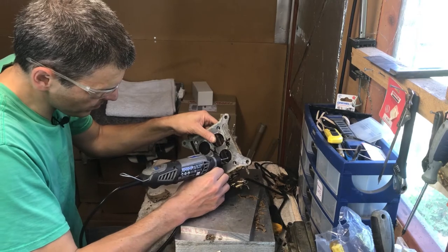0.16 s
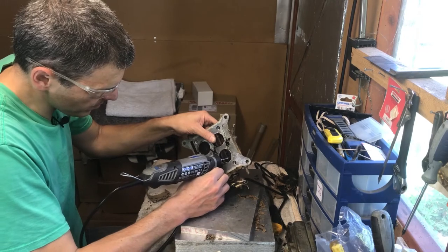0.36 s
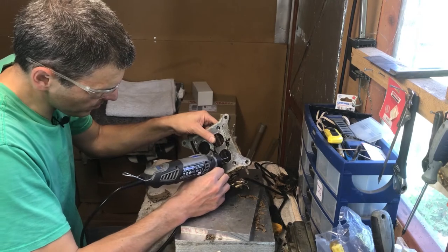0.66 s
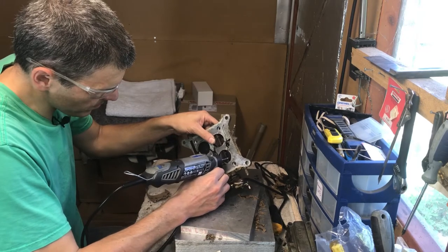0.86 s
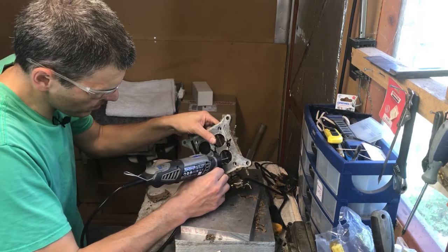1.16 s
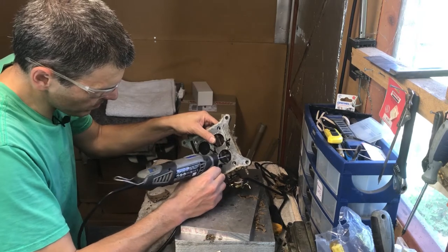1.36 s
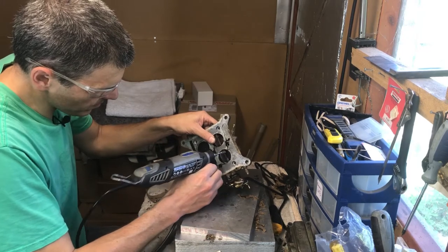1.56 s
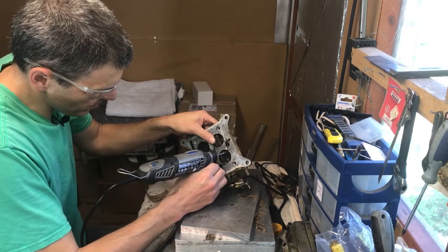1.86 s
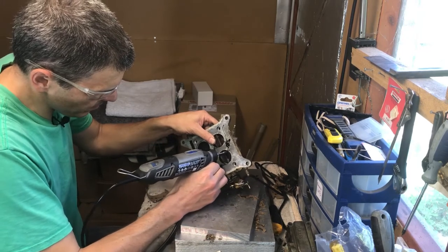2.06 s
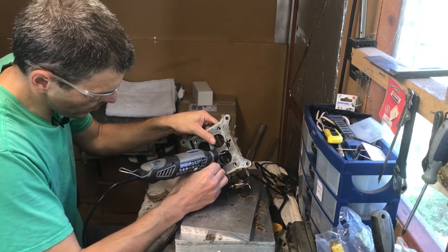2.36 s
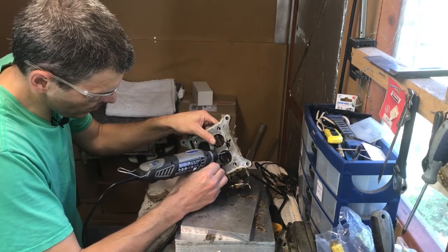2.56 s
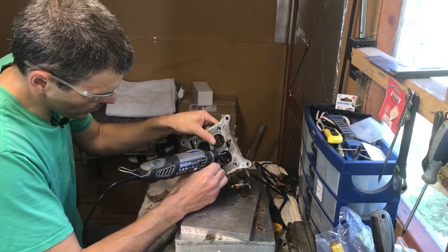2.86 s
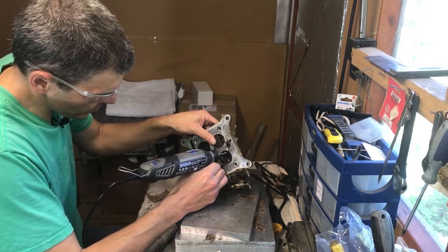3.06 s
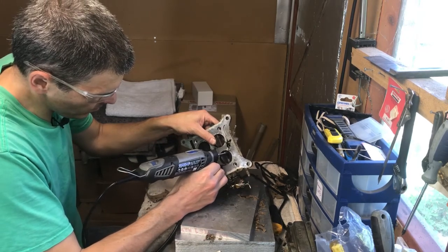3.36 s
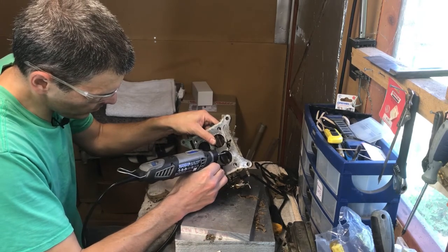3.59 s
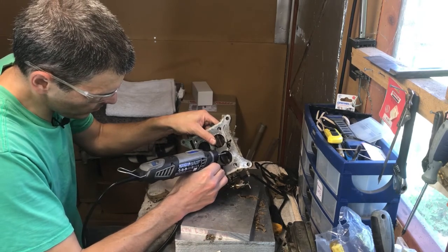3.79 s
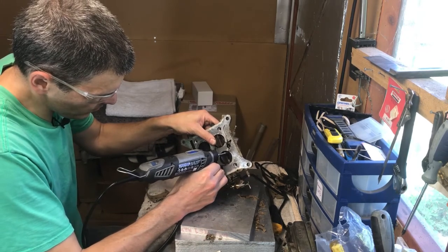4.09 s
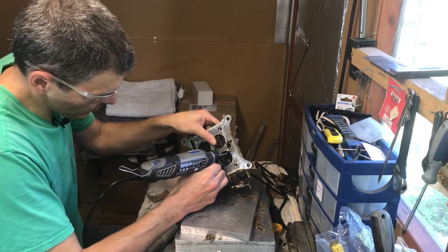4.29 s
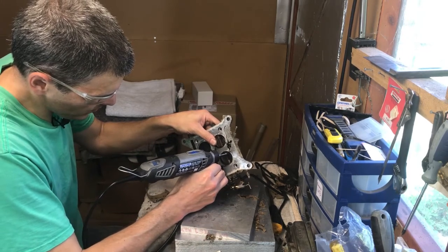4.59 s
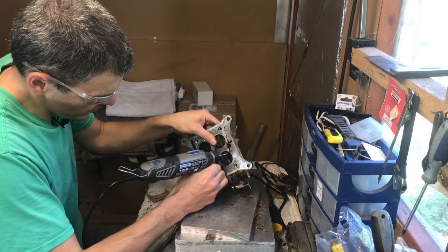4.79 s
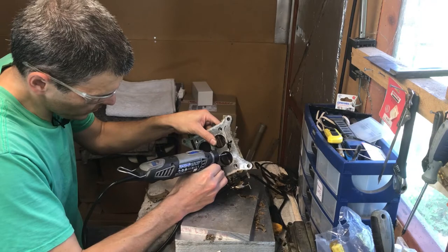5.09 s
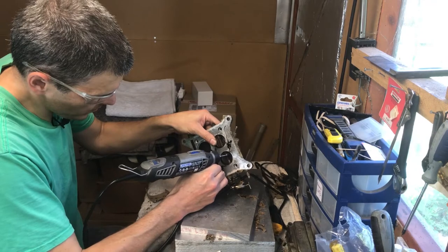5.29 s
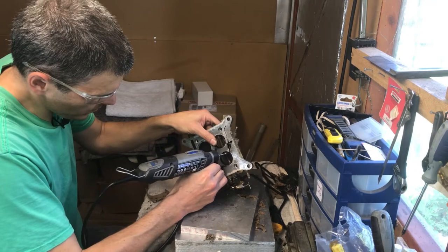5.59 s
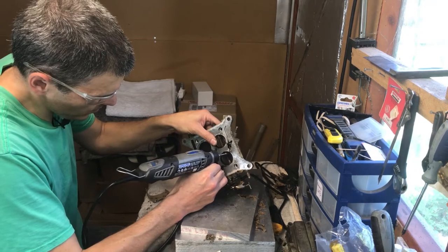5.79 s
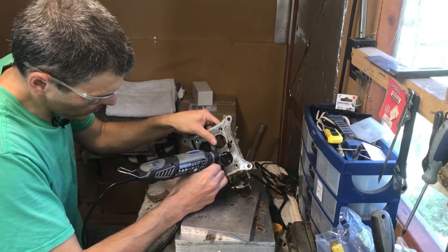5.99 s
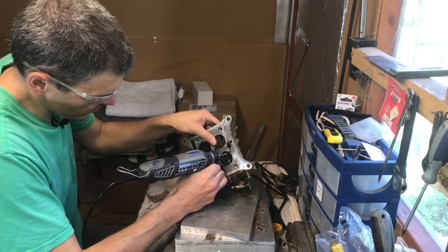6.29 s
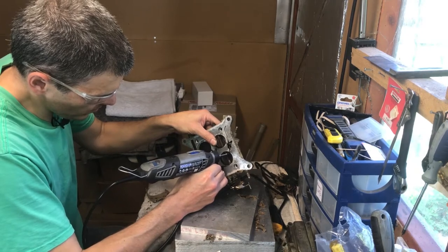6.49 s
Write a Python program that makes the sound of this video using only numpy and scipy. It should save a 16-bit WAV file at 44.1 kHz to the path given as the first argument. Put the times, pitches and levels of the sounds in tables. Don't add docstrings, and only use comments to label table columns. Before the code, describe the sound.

A handheld rotary grinder runs continuously close to the microphone in a small workshop. Its shrill motor whine and airy fan hiss hold steady while the bit rasps a cast metal part in short pushes. The cutting lightens for a moment, leaving the whine exposed, then returns harder and brighter, with the part ringing and faintly rocking on the bench.

```python
import sys
import numpy as np
from scipy import signal
from scipy.fft import rfft, irfft
from scipy.io import wavfile
from scipy.ndimage import uniform_filter1d

SR = 44100
rng = np.random.default_rng(int(sys.argv[2]) if len(sys.argv) > 2 else 0)


def digitize_waveform(pressure):
    field = np.atleast_2d(pressure).T
    bounded = np.clip(field, -1, 1)
    quanta = np.round(bounded * 32767).astype(np.int16)
    wavfile.write(sys.argv[1], SR, quanta)


def gain_from_db(level_db):
    decades = np.asarray(level_db, float) / 20
    return 10 ** decades


N = 293265
TIME = np.arange(N) / SR
HZ = np.fft.rfftfreq(N, 1 / SR)

BARS, SLOTS, TORQUE_HZ = 24, 8, 100.2
# tones_per_turn, level_db, rise_db_per_percent_of_speed
MAIN_TONES = [
    (24, -33, .6),
    (16, -42, 1),
    (12, -44.5, 1),
    (8, -40.5, 0),
    (1, -49.5, 1.5),
]
# tones_per_turn, level_db (against the whine)
WEAK_TONES = [(5, -16), (7, -16), (7.25, -14), (9, -16), (15, -14), (20, -17), (23, -14), (25, -13),
              (36, -15)]
# pitch_hz, level_db
MAINS_HUM = [(100, -75.5), (199.5, -61), (300, -59)]
# time_s, length_s, tones_per_turn (0 = side tones), change_db
GRIP_SHIFTS = [(0, .4, 24, -9), (1.42, .3, 24, 3), (1.85, .35, 24, -4), (.3, .7, 16, 5),
               (1.45, .2, 16, -12), (3.4, .2, 16, -7), (4.9, .9, 16, 5), (5.8, .5, 16, -6), (.2, .6, 12, 4),
               (1.8, .36, 12, 7), (3, .2, 12, 6), (3.7, .4, 12, 3), (4.8, .8, 12, -4), (5.85, .6, 12, 4),
               (1.47, .42, 8, 7), (1.8, .25, 8, -14), (3.3, 1.4, 8, 2), (4.8, .5, 8, -4), (6.1, .9, 8, -7),
               (0, .3, 1, -4), (5, 1.1, 1, -6), (.2, .2, 0, 8), (.98, .7, 0, 11), (2.4, .3, 0, 6),
               (5.3, .4, 0, 6), (5.35, .45, 8, 5), (1.65, .9, 7.25, 5), (5.1, 1.5, 7.25, 4),
               (1.4, .3, 12, -3), (6, 1.2, 24, 2)]
# time_s, whine_hz
FREE_SPEED = [(0.0, 9550), (0.13, 9483), (0.5, 9606), (0.69, 9658), (1.3, 9626), (1.35, 9692), (2.28, 9553),
              (2.5, 9656), (2.95, 9545), (3.11, 9629), (4.16, 9575), (4.49, 9540), (4.64, 9681),
              (4.94, 9642), (5.35, 9605), (5.48, 9377), (5.67, 9701), (6.65, 9572)]

# pitch_hz, level_db (per Hz)
FAN_COLOUR = [(25, -23), (70, -17), (140, -22), (520, -32), (650, -12), (1300, -10), (2600, -3), (4500, -3),
              (8500, -4), (10400, -5), (11500, -1.5), (15500, -5.5)]
# pitch_hz, width_hz, level_db
CASE_HUM = [(191.4, 14, -70.5), (436.4, 18, -56), (616, 26, -50.5), (987, 72, -45.5), (1937, 140, -54),
            (2800, 130, -54)]
# time_s, length_s, rise_db
ROCKS = [
    (.2, .5, 6),
    (.98, .15, 8),
    (2.66, .25, 10),
    (3.15, .2, 7),
    (4.1, 1.5, 6),
    (5.15, 0.89, 13.5),
    (5.72, .2, 10),
    (6.1, .6, 7),
]

# centre_s, peak_db, length_s, low_ring_db (extra as the bit's side bites)
PUSHES = [(0.04, -20.0, 0.092, 1.8), (0.125, -25.8, 0.099, 3.1), (0.314, -19.9, 0.215, 1.2),
          (0.44, -21.3, 0.07, 0.0), (0.509, -18.8, 0.097, -0.1), (0.78, -25.0, 0.427, 0.6),
          (0.983, -22.4, 0.199, 0.9), (1.32, -27.6, 0.35, 0.9), (1.593, -29.7, 0.6, 0.7),
          (1.92, -31.0, 0.491, 0.8), (2.145, -22.2, 0.275, 1.4), (2.39, -26.7, 0.6, 1.1),
          (2.574, -20.9, 0.122, 0.1), (2.692, -23.2, 0.089, 0.5), (2.903, -20.3, 0.312, -0.9),
          (3.235, -19.9, 0.217, -0.6), (3.593, -20.6, 0.259, -0.1), (3.87, -20.2, 0.247, 0.0),
          (4.121, -18.4, 0.164, 0.0), (4.332, -17.5, 0.243, 0.8), (4.48, -20.4, 0.135, 1.0),
          (4.701, -16.5, 0.227, -0.8), (4.955, -17.2, 0.144, 0.1), (5.198, -17.2, 0.225, -0.0),
          (5.45, -20.9, 0.179, 2.8), (5.667, -16.0, 0.107, 0.4), (5.858, -17.0, 0.202, -0.1),
          (6.109, -18.0, 0.143, 1.4), (6.36, -17.5, 0.159, 1.2), (6.605, -17.3, 0.106, -0.3)]
MOVES_S = [
    1.5,
    3.5,
]
BOUNCE_HZ = [
    51.92,
    60,
    62.9,
]
# time_s, level_db (above the rasp around it)
KNOCKS = [(0.0326, 4.8), (0.2385, 5.1), (0.2609, 4.1), (0.2963, 3.9), (0.3172, 6.8), (0.3428, 6.2),
          (0.4326, 4.4), (0.4773, 4.6), (0.514, 5.8), (0.5327, 3.9), (0.6503, 6.1), (1.019, 4.7),
          (2.5868, 3.8), (2.8309, 3.9), (2.8983, 5.0), (2.9754, 4.6), (3.2669, 4.4), (3.89, 4.0),
          (4.2788, 3.8), (4.2995, 4.7), (4.3568, 4.0), (4.5069, 3.9), (4.9373, 3.8), (4.9653, 5.2),
          (5.158, 3.9), (5.1984, 4.5), (5.6264, 4.1), (5.7179, 5.1), (5.8485, 3.8), (6.1175, 3.7)]
# pitch_hz, level_db (per Hz)
CHIP_COLOUR = [(200, -29.5), (520, -25), (900, -22.5), (1300, -18.5), (2500, -4), (3500, -9.5),
               (5300, -3.5), (6600, -2), (9000, -4), (10400, -8.5), (11800, -9.5), (15500, -12)]
PART_HZ = [301, 990, 1125, 1520, 2174, 2595, 3640, 4220, 4371, 4565, 5146, 5285, 5706, 6060, 7050, 7850,
           8400, 8505, 8700, 9050, 11412, 12050, 13460, 13600, 14384, 14900]
# width_hz, first_spot_db, second_spot_db, third_spot_db
PART_RINGS = [(29, -15.5, -19.5, -18), (50, -8, -10, -10.5), (47.8, -12.5, -13.5, -12),
              (72, -8.5, -15.5, -15), (34, -9.5, -12.5, -12), (110, -14, -8.5, -13), (30, -28, -25, -22),
              (34.3, -10, -11, -13), (39, -29, -17, -14.5), (60, -15, -12, -36), (60, -0.5, -16, -16),
              (230, -7, -5, -1.5), (115, -8, -7, -11), (90, -6.5, -9, -10), (121, -17.5, -5, -2),
              (79.6, -28, -9, -7), (130, -12, -5, -19), (50, 1, -20, -24), (150, -14, -10, -7),
              (200, -6.5, -7, -7), (70, -9, -10, -16), (50, -15, -15.5, -10), (50, -26, -19, -26),
              (80, -26, -11, -23), (55, -24, -18, -5), (150, -25, -17, -19.5)]
# pitch_hz, width_hz, change_db
ECHO_DIPS = [(514, 59, -5), (1273, 54, -2), (10350, 290, -3), (14120, 300, -1.5)]

THIN_SLICES = [0, 4, 32, 33, 40, 56, 88, 89, 104, 112, 156, 179, 200, 209, 221, 240, 263, 264, 270, 275]
SLICE_S, FIRST_SLICE_S = 1024 / 48000, .0515


def level(x, db):
    return x * gain_from_db(db) / np.sqrt(np.mean(x ** 2))


def colour(x, points):
    hz, db = np.transpose(points)
    return irfft(rfft(x) * gain_from_db(np.interp(np.log(HZ + 1), np.log(hz), db)), N)


def ring(x, modes):
    gain = sum(gain_from_db(db) * 1j * w * HZ / (f ** 2 - HZ ** 2 + 1j * w * HZ) for f, w, db in modes)
    return irfft(rfft(x) * gain, N)


def walk(rate):
    hold = int(SR / rate)
    steps = np.repeat(rng.standard_normal(N // hold + 1), hold)
    return 1.3 * uniform_filter1d(uniform_filter1d(steps, hold), hold)[:N]


def swells(rows):
    slow = TIME[::100]
    bumps = (size * np.exp(-(2 * (slow - s) / length) ** 2) for s, length, size in rows)
    return np.interp(TIME, slow, sum(bumps, 0 * slow))


def push():
    resting_db = -31
    power = gain_from_db(resting_db) ** 2 + swells((s, length, gain_from_db(db) ** 2) for s, db, length, _ in PUSHES)
    side_bite = swells((s, length, gain_from_db(db) ** 2 * extra) for s, db, length, extra in PUSHES)
    return np.sqrt(power), side_bite / power


def speed(load):
    sag_hz, sag_at_db, rotor_lag_s = 524, -20, .4
    keep = np.exp(-1 / (rotor_lag_s * SR))
    felt = signal.lfilter([1 - keep], [1, -keep], load - load[0]) + load[0]
    s, free_hz = np.transpose(FREE_SPEED)
    free = uniform_filter1d(np.interp(TIME, s, free_hz), size=2500)
    return free - sag_hz * felt / gain_from_db(sag_at_db)


def grip(order):
    return swells((s, length, db) for s, length, k, db in GRIP_SHIFTS if k == order)


def motor(turn, whine_hz):
    usual_hz, side_tone_db = 9170, -48
    torque = 2 * np.pi * TORQUE_HZ * TIME
    faster = 100 * (whine_hz / usual_hz - 1)
    tones = [(k, db + rise * faster + grip(k)) for k, db, rise in MAIN_TONES]
    whine_db = tones[0][1]
    tones += [(k, whine_db + db + grip(k)) for k, db in WEAK_TONES]
    out = np.zeros(N)
    for hz, db in MAINS_HUM:
        out += gain_from_db(db + 2.1 * walk(15)) * np.sin(2 * np.pi * hz * TIME + 0.37 * walk(9.8))
    for k, db in tones:
        loose = min(k / SLOTS, 1)
        wobble = (0.18 * walk(60) + 0.14 * np.sin(torque + k)) * loose
        out += gain_from_db(db + (1.2 + 0.9 * loose) * walk(25)) * np.sin(k * turn + wobble)
    for n, db in ((1, 0), (2, -7)):
        side_db = side_tone_db + grip(0) + db + 1.5 * walk(9)
        out += gain_from_db(side_db) * np.sin(SLOTS * turn - n * torque)
    return gain_from_db(4) * out


def fan(turn):
    fan_db, bench_db = -26, -63.5
    air = rng.standard_normal(N) * (1 + 0.37 * np.sin(turn)) * gain_from_db(1.7 * walk(40))
    case = sum(level(ring(rng.standard_normal(N), [(f, w, 0)]), db) for f, w, db in CASE_HUM)
    bench_mode = [(65.0, 40, 0)]
    bench = ring(ring(rng.standard_normal(N), bench_mode), bench_mode)
    rumble = gain_from_db(bench_db + swells(ROCKS)) * level(bench, -0.95)
    return level(colour(air, FAN_COLOUR), fan_db) + case + rumble


def spots():
    moved = [np.clip((TIME - s) / .4, 0, 1) for s in MOVES_S]
    return [1 - moved[0], moved[0] - moved[1], moved[1]]


def contact(turn, load):
    bounce_db, knock = 7.5, 1.9
    rate = sum(hz * on for hz, on in zip(BOUNCE_HZ, spots()))
    phase = np.cumsum(rate * (1 + .13 * walk(30))) / SR
    size = rng.uniform(0.69, 1, N // 300)[phase.astype(int)]
    force_db = bounce_db * load * size * np.sin(np.pi * phase) ** 4
    for s, db in KNOCKS:
        near = slice(int((s - .009) * SR), int((s + 0.0097) * SR))
        age = TIME[near] - s + 0.00032
        width_s = np.where(age < 0, .0016, .0026)
        force_db[near] = knock * db * np.exp(-.5 * (age / width_s) ** 2)
    force = gain_from_db(uniform_filter1d(force_db, size=20))
    force = force / np.sqrt(uniform_filter1d(force ** 2, size=4000))
    return force * (1 + .15 * np.sin(turn)) * (1 + .1 * np.sin(2 * np.pi * TORQUE_HZ * TIME))


def ringing_part(blows):
    sharpest = 50
    out = np.zeros(N)
    for k, on in enumerate(spots()):
        modes = [(f, max(row[0], min(f, 6000) / sharpest), row[k + 1]) for f, row in zip(PART_HZ, PART_RINGS)]
        out += np.sqrt(on) * gain_from_db(2.0 * walk(7.6)) * level(ring(blows, modes), -7.0)
    return out


def cut_share(db, air_db):
    return np.sqrt(np.maximum(gain_from_db(db) ** 2 - gain_from_db(air_db) ** 2, gain_from_db(db) ** 2 / 20))


def near_echoes(dry):
    fade_s, changes_hz = 0.05, 5
    age = TIME[:8000]
    tails = rng.standard_normal((10, 8000)) * np.exp(-np.log(1000) * age / fade_s) * (age > .002)
    mix = np.array([walk(changes_hz) for _ in tails])
    mix = mix / np.sqrt(np.sum(mix ** 2, axis=0))
    out = np.zeros(N)
    for on, tail in zip(mix, tails):
        out += signal.oaconvolve(dry * on, tail / np.sqrt(np.sum(tail ** 2)))[:N]
    return gain_from_db(-5.5) * out


def grinding(turn, load, side_db):
    heard_db = 20 * np.log10(load) - 2.5
    body_db = side_db - 27.5 + .78 * (heard_db + 22)
    hiss_db = -26 + 1 * (heard_db + 21.5)
    grit_db = np.minimum(2 * rng.exponential(size=N), 9)
    force = contact(turn, np.clip((heard_db + 31) / 6, .3, 1))
    chips = force * rng.standard_normal(N) * gain_from_db(grit_db)
    blows = chips * force ** .7
    metal = rfft(ringing_part(blows) + level(colour(chips, CHIP_COLOUR), -4.5))
    body = irfft(metal / (1 + (HZ / 3700) ** 6), N)
    hiss = irfft(metal / (1 + (9800 / (HZ + 1)) ** 12), N)
    middle = irfft(metal, N) - body - hiss
    dry = cut_share(heard_db, -29.5) * level(middle, 0.67)
    dry += cut_share(body_db, -32) * level(body, 0.12)
    dry += cut_share(hiss_db, -38.5) * level(hiss, 0.11)
    return dry + near_echoes(dry)


def scene():
    load, side_db = push()
    whine_hz = speed(load)
    turn = 2 * np.pi * np.cumsum(whine_hz / BARS) / SR
    dips_db = sum(db * np.exp(-.5 * ((HZ - hz) / width) ** 2) for hz, width, db in ECHO_DIPS)
    noise = fan(turn) + grinding(turn, load, side_db)
    noisy = irfft(rfft(noise) * gain_from_db(dips_db), N)
    return np.tile(motor(turn, whine_hz) + noisy, (2, 1))


def thin_out(x, count=10):
    m = int(round(SLICE_S * SR))
    n = np.arange(2 * m) + .5
    waves = np.cos(np.pi / m * np.outer(np.arange(m) + .5, n + m / 2))
    basis = np.sqrt(2 / m) * np.sin(np.pi * n / (2 * m)) * waves
    out = x.copy()
    for k in THIN_SLICES:
        start = int(FIRST_SLICE_S * SR) + (k - 1) * m
        lines = basis @ x[start:start + 2 * m]
        over = np.abs(lines) / (uniform_filter1d(lines ** 2, size=121) ** .32 + 1e-4)
        lost = lines * (over < np.sort(over)[-count])
        out[start:start + 2 * m] -= (1 - gain_from_db(-40)) * lost @ basis
    return out


def band_limit(x):
    return signal.sosfilt(signal.butter(12, 17070, fs=SR, output="sos"), x)


def record(dry):
    top_hz = 15750
    soft = irfft(rfft(np.tanh(dry[0])) * (HZ < top_hz), N)
    mix = np.tile(thin_out(soft), (2, 1))
    return band_limit(mix)


dry = scene()
out = record(dry)
digitize_waveform(out)
```